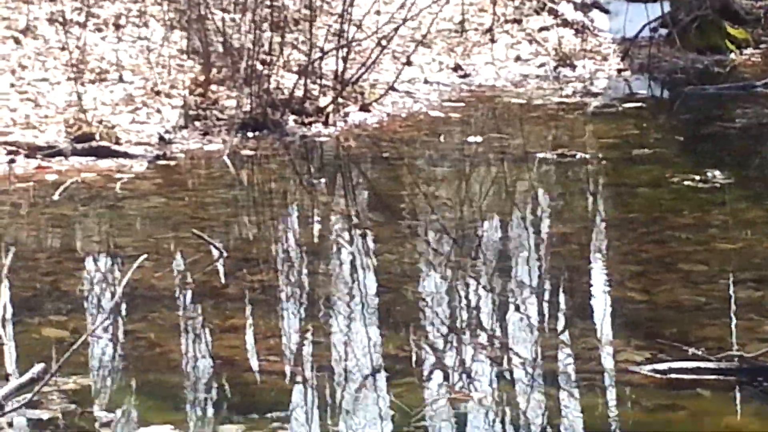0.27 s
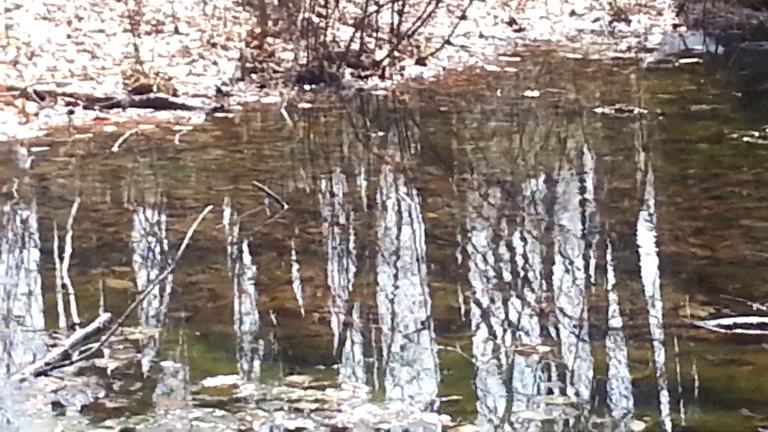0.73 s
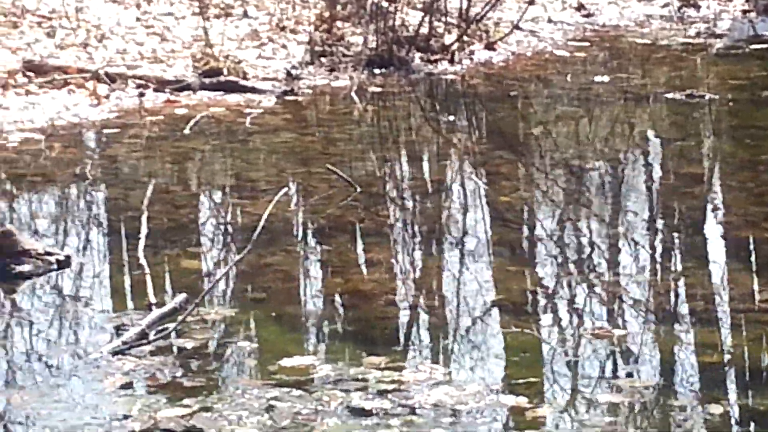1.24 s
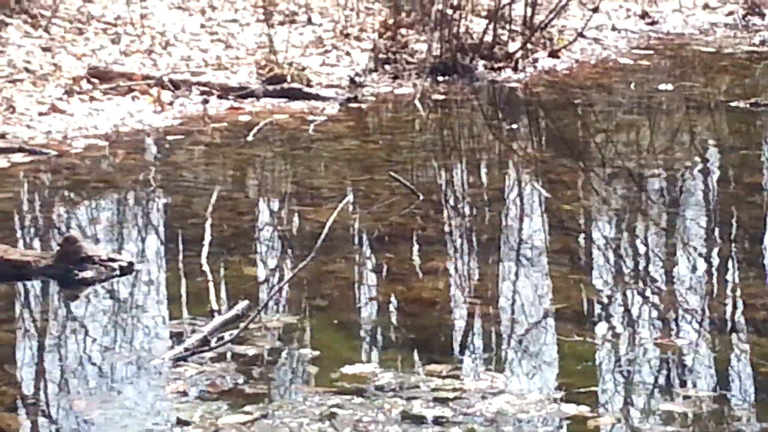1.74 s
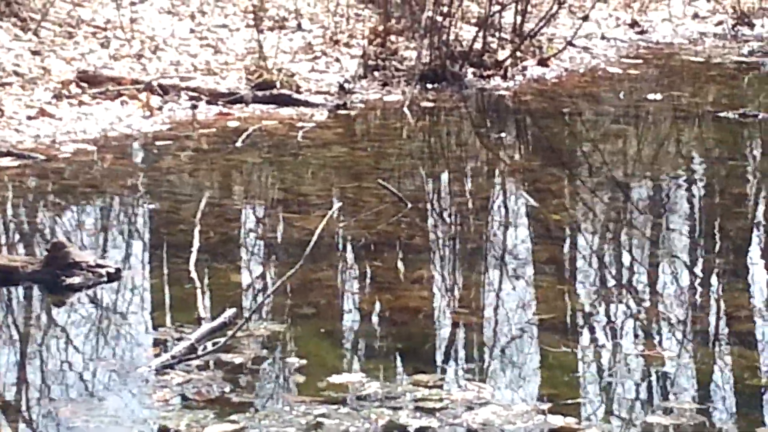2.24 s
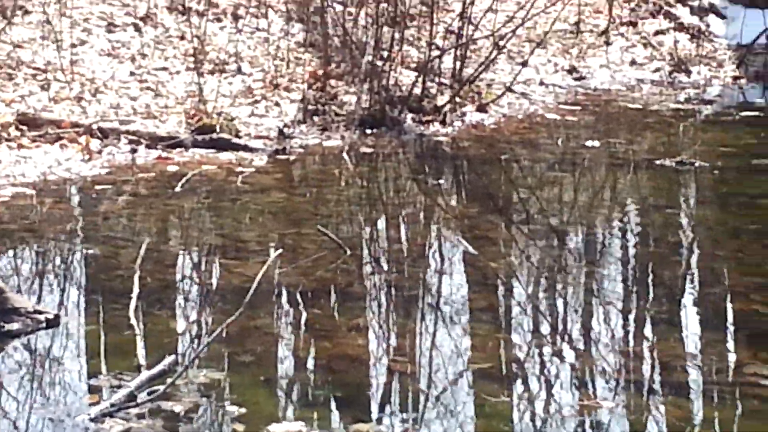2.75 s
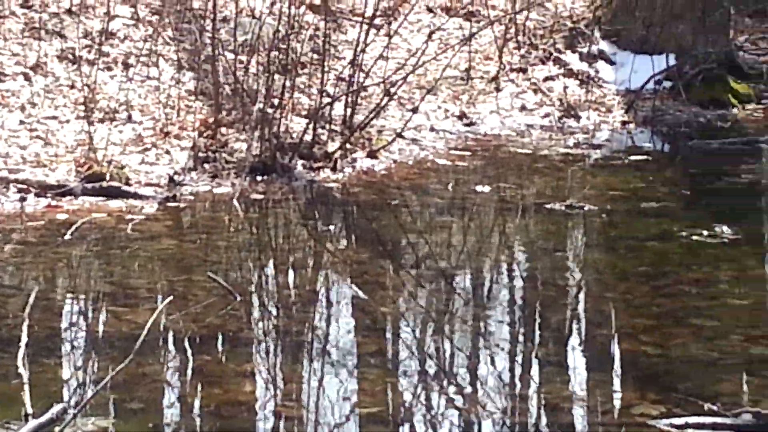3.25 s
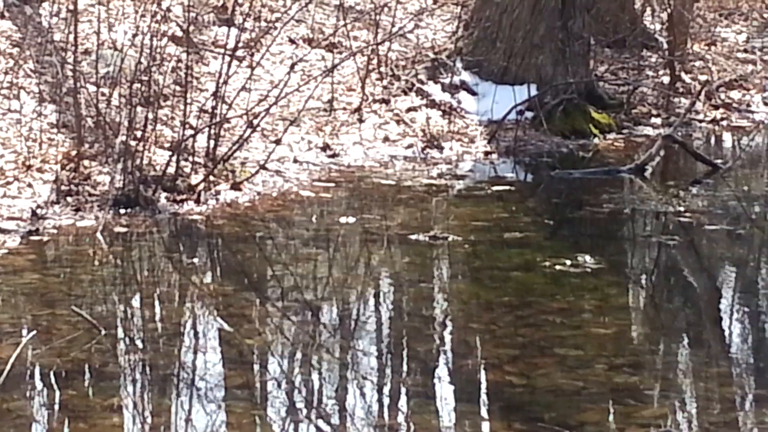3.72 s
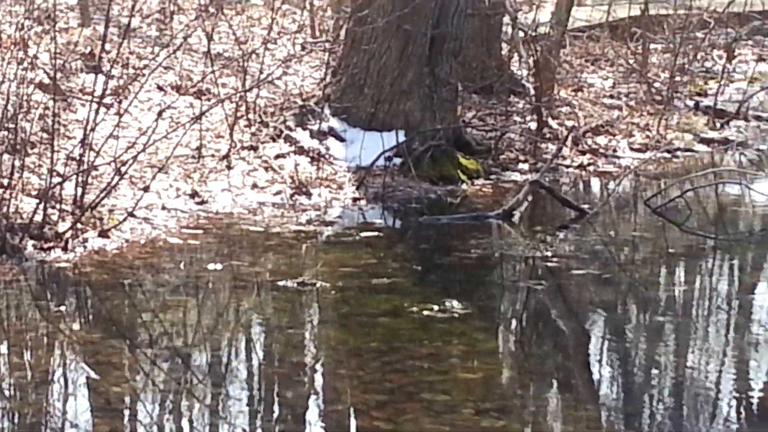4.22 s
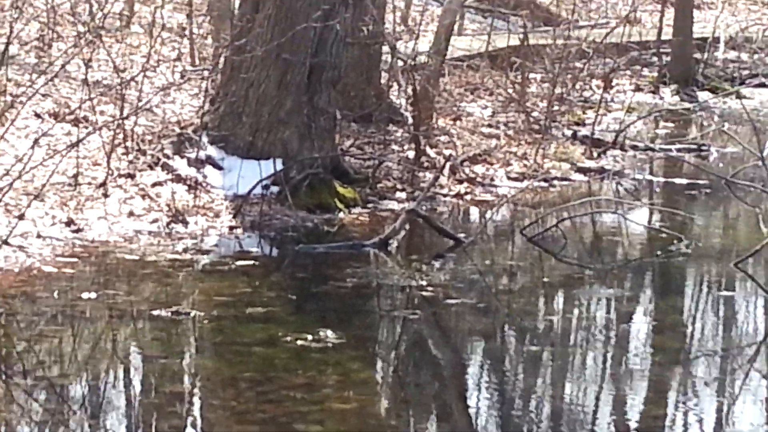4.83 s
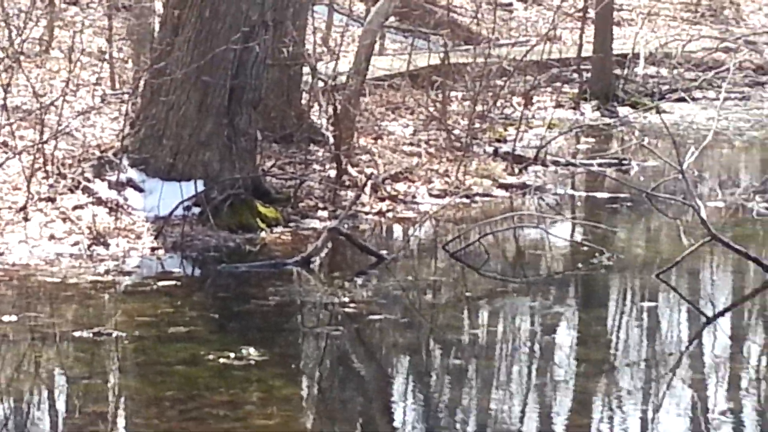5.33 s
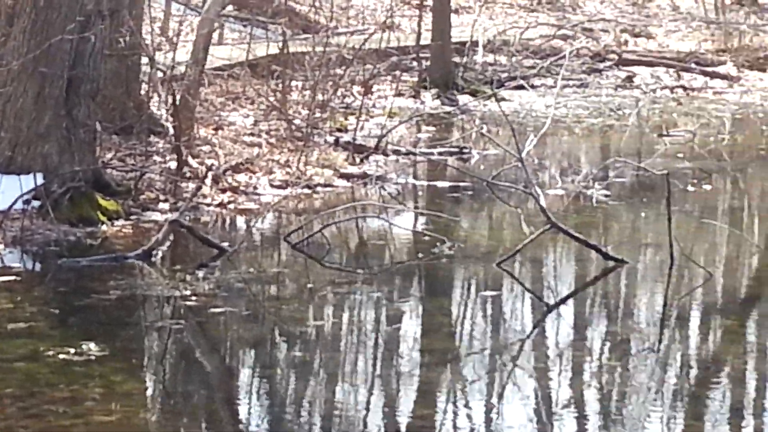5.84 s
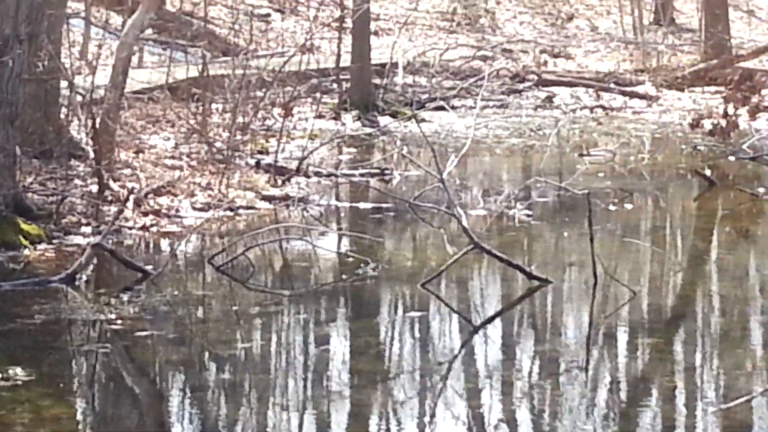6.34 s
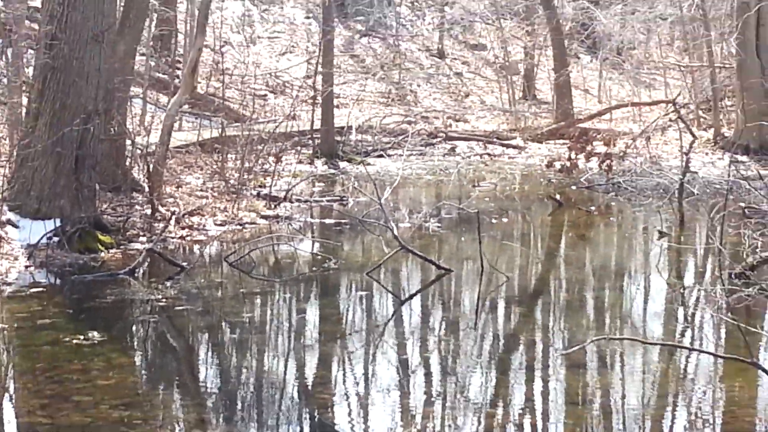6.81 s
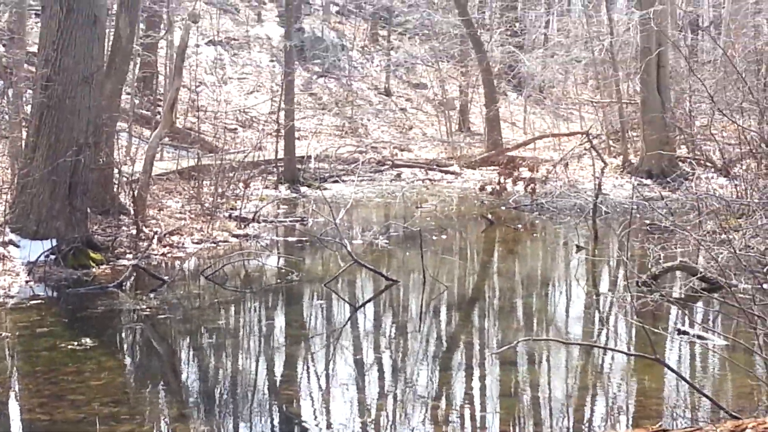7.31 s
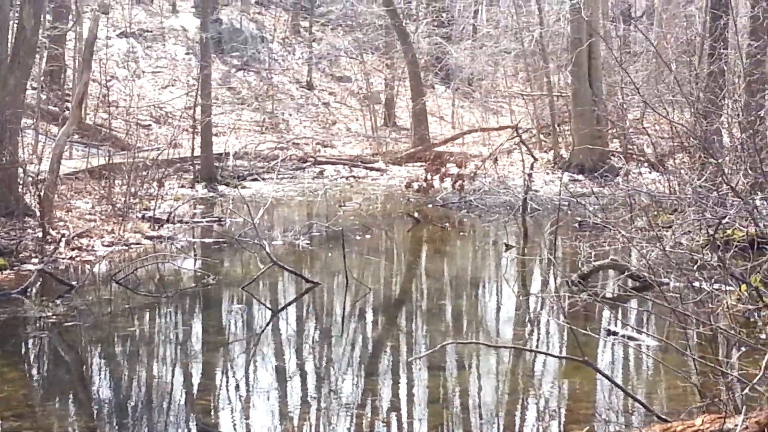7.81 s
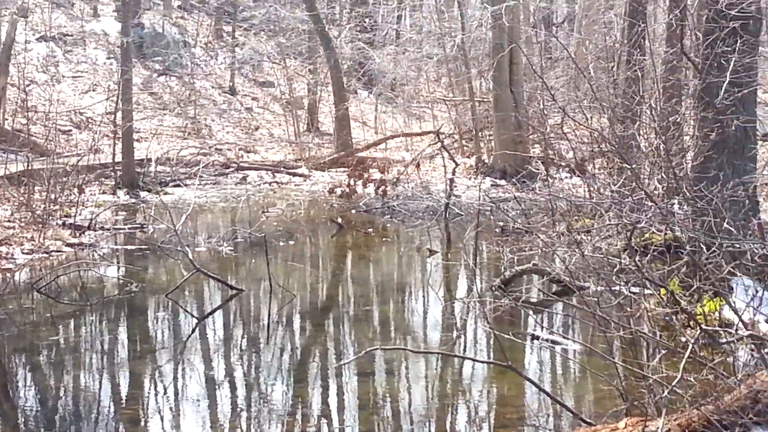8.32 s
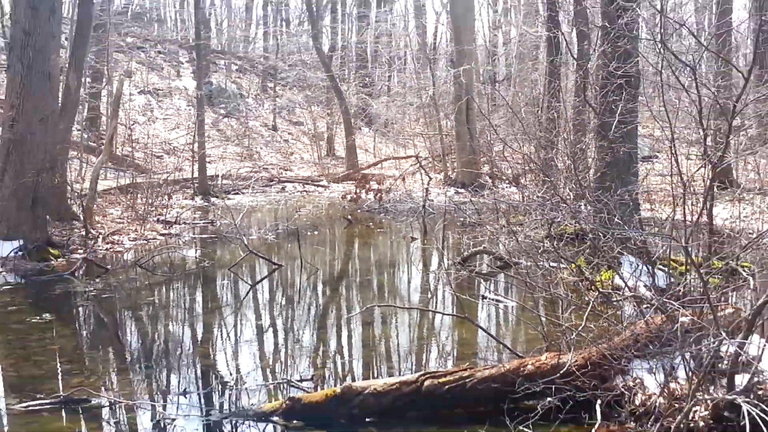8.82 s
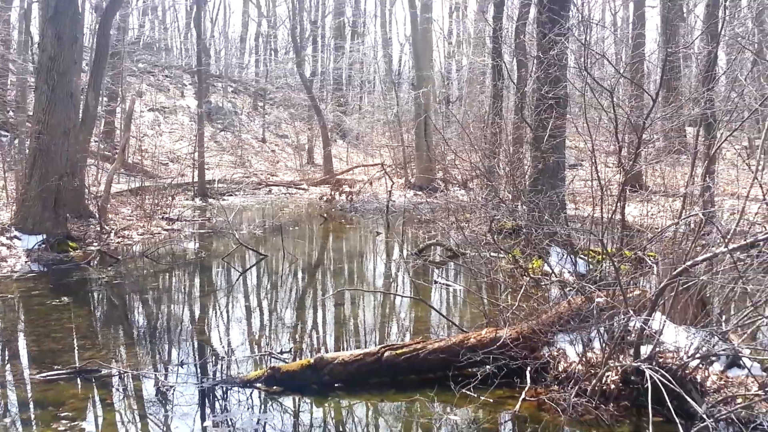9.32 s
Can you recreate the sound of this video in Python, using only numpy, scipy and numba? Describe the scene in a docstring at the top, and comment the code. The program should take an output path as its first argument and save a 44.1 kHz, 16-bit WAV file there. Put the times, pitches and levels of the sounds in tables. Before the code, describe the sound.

Short, clucking frog croaks overlap all around a pond in the woods, picked up in stereo by a hand-held microphone. The close ones are fairly dry, a few sharply louder, while the distant ones blur into an echoing chorus. A soft low handling thump comes about halfway, then a quick leaf scuff on the right, then two more thumps on the left, all over faint rumble and hiss.

```python
"""A woodland pond, from a hand-held camera with two microphone ports: frogs croaking all round.
A few dozen near croaks stand out of a far chorus; each is a short train of throat pulses that ring
the vocal sac and the mouth. Trunks scatter the calls, the far ones most. Leaves scuff once on the right,
the hand thumps the camera three times, and distant rumble and microphone hiss lie underneath."""
import sys
import numpy as np
from scipy import signal
from scipy.fft import rfft, irfft, next_fast_len
from scipy.io import wavfile
from numba import njit

SR = 44100
rng = np.random.default_rng(int(sys.argv[2]) if len(sys.argv) > 2 else 0)


def unload_wav(signal):
    """Save mono or channel-first audio to the path in sys.argv[1] as 16-bit WAV at rate SR, clipped to [-1, 1]."""
    wavfile.write(
        sys.argv[1],
        SR,
        np.round(np.clip(np.atleast_2d(signal).T, -1, 1) * 32767).astype(np.int16),
    )


N = 421596

# Croaks near the microphone: start_s, level_db, pitch_hz, length_ms, swell_share (of the length)
NEAR_CROAKS = [(0.0,-20,1560,21,0.32),(0.097,-24,1608,35,0.24),(0.257,-21,1598,24.3,0.41),(0.331,-28.5,1306,15,0.38),
               (0.375,-21.5,1548,42.3,0.25),(0.487,-22,1710,19,0.48),(0.616,-28.5,1490,24.5,0.34),(0.716,-17.5,1972,28.4,0.29),
               (0.788,-20,1710,20,0.41),(0.828,-9.5,1734,25,.04),(0.997,-22.5,1295,20,0.24),
               (1.353,-27.5,1498,29,0.36),(1.427,-27,1458,47,0.39),(1.485,-23.5,1443,83,.2),
               (1.59,-23.5,1526,31,.3),(1.73,-22.5,1490,44,0.28),(1.8,-23,1490,17,0.35),
               (1.868,-11,1715,26,.25),(2.062,-25.5,1425,20,0.39),(2.138,-27.5,1510,72,.2),
               (2.262,-24.5,1720,24,0.31),(2.443,-26,1500,27,0.38),(2.481,-21.5,1560,35,0.34),(2.77,-25.5,1642,40,0.24),
               (2.98,-24.5,1425,18,0.22),(3.13,-26,1524,24.5,0.38),
               (3.34,-18,1743,37.6,0.34),(3.44,-25,1620,51,0.19),(3.567,-13.5,1723,28,0.35),
               (3.764,-25,1674,66,0.32),(3.881,-23,1526,27,0.36),(4.012,-33,1465,32,0.27),
               (4.145,-23.5,1693,28.6,0.28),(4.302,-35,1412,59,0.29),(4.422,-23.5,1580,33,0.38),
               (4.497,-17,1683,38.6,0.42),(4.582,-25.5,1518,27,0.32),(4.706,-20,1448,26.5,0.22),
               (5.12,-23.5,1628,27,0.33),(5.287,-26.5,1394,35,0.27),(5.345,-24.5,1256,33,0.26),(5.404,-24.5,1519,35,.25),
               (5.626,-22,1693,25,0.29),(5.702,-26,1515,25,0.39),(5.807,-24.5,1456,35,0.48),
               (5.962,-16,1736,17.7,0.18),(6.064,-23.5,1590,26,.2),
               (6.244,-22.5,1507,51.6,0.33),(6.727,-21.5,1458,65,0.24),(7.103,-21,1619,45,0.29),
               (7.23,-16.5,1683,32.5,0.28),(7.347,-9.5,1620,25.4,.14),(7.656,-26,1413,34,0.28),
               (7.747,-22.5,1414,69,0.17),(7.905,-19.5,1583,38,.36),(7.976,-22,1552,39,0.37),
               (8.061,-19.5,1584,16.4,0.23),(8.199,-26.5,1436,37,0.51),(8.289,-21,1600,49,0.23),
               (8.432,-8.5,1518,20.5,0.14),(8.598,-23.5,1530,19,0.5),(8.632,-20.5,1636,33,.12),
               (8.662,-19,1511,35,0.32),(8.702,-21,1592,22,.4),(8.722,-18,1506,37,.25),
               (8.834,-18.5,1702,30,0.2),
               (9.04,-24,1730,29,0.29),(9.166,-21.5,1467,20.4,0.28),(9.23,-21.5,1454,37,0.37),(9.296,-20.5,1578,22.7,0.32),
               (9.424,-21,1450,32.5,0.28),(9.531,-11.5,1474,20.3,0.21)]
# Near croaks with a bright mouth ring: start_s, ring_hz, ring_db
BRIGHT_MOUTHS = [(0.375,3300,-9),(0.714,2800,2),(0.828,3870,-22),(1.868,2640,-5),
                 (3.13,4600,-6),(3.34,4230,-7.5),(3.44,3750,-10),(3.567,3300,-7),(4.422,2800,-6),
                 (4.706,3470,-8),(7.348,2970,-11.5),(7.905,3090,-12.5),
                 (8.704,3050,4.5),(8.834,3030,-7),(9.229,3030,-4),(9.531,2640,-10)]
# Modes of the vocal sac, rung by each pulse: pitch_ratio, t60_ms, gain_db
SAC_MODES = [(0.98, 7.58, 5.5), (0.523, 19.5, -12.5), (0.833, 21.7, -17), (1.34, 3.3, -10.5)]
# Level of the far croaks over time: time_s, level_db
CHORUS_LEVELS = [(0.0, -36), (1.1, -36.5), (2.2, -40.5), (3.7, -34), (4.95, -42), (5.9, -30.5), (6.55, -40),
                 (7.15, -29.5), (7.5, -41), (8.0, -37), (9.56, -32)]
# The hand on the camera body: start_s, level_db, pitch_hz, t60_ms, left_minus_right_db
HAND_THUMPS = [(4.533, -21, 219, 21, 3), (8.591, -32, 97.5, 31, 29), (9.135, -31.5, 99, 18, 30)]
# Spectrum of distant rumble and microphone hiss: frequency_hz, density_db (per Hz)
NOISE_SPECTRUM = [(25, -108), (70, -86.5), (160, -82), (430, -83.5), (1500, -84), (4000, -100),
                  (6300, -105), (8200, -102), (14000, -102)]

PITCH_SAG = 0.069  # share by which every ring drops over a croak


def throat_pulses(pitch_hz, length_ms, swell, slip_cycles):
    """The throat fires 22 pulses that speed up, swell and fade. Returns their offsets (s) and gains (dB)."""
    order = np.arange(-2, 20)  # two lead pulses come before the croak proper
    gap_scatter, slip, size_scatter = rng.standard_normal((3, len(swell), len(order)))
    first_gap_s = (6 - 5 * swell) / 1000 * np.exp(rng.normal(0, .1014, swell.shape))
    gaps = first_gap_s * (.62 + .38 * .8 ** np.maximum(order, 0)) * np.exp(.0775 * gap_scatter)
    gaps *= np.where((order < 0) & (swell < .15), 2, 1)  # lead pulses of sudden croaks stand apart
    # Pulses fall nearly in step with the sac: gaps last about whole cycles of its sagging pitch.
    elapsed_ms = 1000 * (np.cumsum(gaps, axis=1) - gaps[:, :3].sum(axis=1, keepdims=True))
    sac_hz = SAC_MODES[0][0] * pitch_hz * (1 - PITCH_SAG * np.clip(elapsed_ms / length_ms, 0, 1))
    gaps = (np.round(gaps * sac_hz) + slip_cycles * slip) / sac_hz
    offset_s = np.cumsum(gaps, axis=1) - gaps
    offset_s = offset_s - offset_s[:, 2:3]
    progress = 1000 * offset_s / length_ms
    arch_db = -np.where(progress < swell, 50, 18) * (progress - swell) ** 2
    stop_db = -45 * np.maximum(progress - 1, 0)
    lead_db = -7 + 4 * order - 50 * swell ** 2
    return offset_s, np.where(progress < 0, lead_db, arch_db + stop_db) + 1.8 * size_scatter


def frogs(croaks, spread_ms, slip_cycles):
    """Each throat pulse rings the sac, the mouth and a thin top note; the ports hear it slightly apart."""
    start_s, level_db, pitch_hz, length_ms, swell, mouth_hz, mouth_db = np.transpose(croaks)[:, :, None]
    offset_s, pulse_db = throat_pulses(pitch_hz, length_ms, swell, slip_cycles)
    progress = np.clip(1000 * offset_s / length_ms, 0, 1)
    bearing, top_pitch, top_level = rng.standard_normal((3, len(croaks), 1))
    # Loud croaks come from ahead, weak ones from the side, where the lag drifts as the camera turns.
    ahead_db, aside_db = -17.5, -25
    aside = np.clip((ahead_db - level_db) / (ahead_db - aside_db), 0, 1)
    left_lag_s = ((-.33 + .059 * start_s) * aside + spread_ms * bearing) / 1000
    rings = []  # ring_hz, t60_ms, gain_db
    for ratio, t60_ms, gain_db in SAC_MODES:
        slide = progress * (ratio < .9)  # the low modes grow and slide further down
        rings.append((ratio * pitch_hz * (1 - .12 * slide), t60_ms, gain_db + 5 * slide))
    rings.append((mouth_hz * (1 - .06 * progress), 5.5, mouth_db - 5 * progress))
    rings.append((5150 * (1 + .06 * top_pitch), 5, -22 + 3 * top_level))
    pitch_drift = 1 - PITCH_SAG * progress + rng.normal(0, .012, progress.shape)
    decay_scatter = np.exp(rng.normal(0, .2, progress.shape))
    pulse_s = start_s + offset_s
    out = np.zeros((2, N))
    for ring_hz, t60_ms, gain_db in rings:
        hz = (ring_hz * pitch_drift).ravel()
        t60_s = (t60_ms / 1000 * decay_scatter).ravel()
        size = undb(level_db + pulse_db + gain_db).ravel()
        add_rings(out[0], (pulse_s + left_lag_s / 2).ravel(), hz, t60_s, size, rise_s=.0004)
        add_rings(out[1], (pulse_s - left_lag_s / 2).ravel(), hz, t60_s, size * undb(1), rise_s=.0004)
    # The small sacs radiate no bass.
    return signal.sosfilt(signal.butter(4, 520, "high", fs=SR, output="sos"), out)


def near_frogs():
    """Croaks close to the microphone; the mouth rings dully in most, brightly in some."""
    dull_mouth = (2800, -25)  # ring_hz, ring_db
    croaks = np.array([row + dull_mouth for row in NEAR_CROAKS])
    for start_s, ring_hz, ring_db in BRIGHT_MOUTHS:
        croaks[np.argmin(abs(croaks[:, 0] - start_s)), 5:] = ring_hz, ring_db
    return frogs(croaks, spread_ms=.1, slip_cycles=.09)


def far_chorus(count):
    """Random croaks from all round the pond, their pulses more loosely in step with the sac."""
    start_s = rng.uniform(0, N / SR, count)
    level_db = np.interp(start_s, *np.transpose(CHORUS_LEVELS)) + rng.normal(0, 2, count)
    pitch_hz = rng.normal(1480, 190, count)
    length_ms, swell = rng.uniform(23, 38, count), rng.uniform(.1516, .4516, count)
    mouth_hz, mouth_db = 2700 + 2200 * rng.random(count) ** 2, rng.normal(-23, 3, count)
    croaks = np.transpose([start_s, level_db, pitch_hz, length_ms, swell, mouth_hz, mouth_db])
    return frogs(croaks, spread_ms=.24, slip_cycles=.3)


def trunk_echoes(calls, t60_s, level_db):
    """Trunks scatter the calls into a decaying noise tail, different at each port."""
    t = np.arange(SR // 2) / SR
    tail = rng.standard_normal((2, len(t))) * undb(-60 * t / t60_s) * (1 - np.exp(-t / .009))
    tail /= np.sqrt(np.sum(tail ** 2, axis=1, keepdims=True))
    return undb(level_db) * signal.fftconvolve(calls, tail, axes=1)[:, :N]


def leaf_rustle(count):
    """A short scuff of dry leaves off to the right: dense tiny grains, thickest in the middle."""
    middle_s, length_s, left_lag_s = 6.066, .084, .00012
    start_s = middle_s + length_s * (.7 * rng.random(count) + .3 * rng.random(count) - .5)
    hz = 2400 * 6.2 ** rng.random(count)
    t60_s = 8 / hz  # eight cycles
    size = undb(-36.5 - 10 * (hz > 7800) + rng.exponential(2.74, count))
    out = np.zeros((2, N))
    add_rings(out[0], start_s + left_lag_s, hz, t60_s, size * undb(-4 * (hz < 4500)), rise_s=.0001)
    add_rings(out[1], start_s, hz, t60_s, size, rise_s=.0001)
    return out


def hand_thumps():
    """Low knocks of the hand reach the microphone through the camera body."""
    start_s, level_db, hz, t60_ms, pan_db = np.transpose(HAND_THUMPS)
    out = np.zeros((2, N))
    add_rings(out[0], start_s, hz, t60_ms / 1000, undb(level_db + pan_db / 2), rise_s=.003)
    add_rings(out[1], start_s, hz, t60_ms / 1000, undb(level_db - pan_db / 2), rise_s=.003)
    return out


def rumble_and_hiss():
    """Distant rumble and microphone hiss; the bass is half shared by the ports and stronger on the left."""
    size = next_fast_len(N)
    hz = np.arange(size // 2 + 1) * SR / size + 1
    point_hz, point_db = np.transpose(NOISE_SPECTRUM)
    density = undb(np.interp(np.log(hz), np.log(point_hz), point_db))
    shared = .5 / (1 + (hz / 1200) ** 2)
    pan_db = 1.3 / (1 + (hz / 90) ** 2)
    noise = rfft(rng.standard_normal((2, size))) * density * np.sqrt(SR / 4)
    mid, side = noise * np.sqrt([1 + shared, 1 - shared])
    left, right = (mid + side) * undb(pan_db / 2), (mid - side) * undb(-pan_db / 2)
    return irfft(np.array([left, right]), size)[:, :N]


def undb(db):
    """Decibels to amplitude."""
    return 10 ** (np.asarray(db) / 20)


@njit
def add_rings(out, start_s, hz, t60_s, size, rise_s):
    """Add damped sines with soft onsets, timed to a fraction of a sample."""
    for k in range(len(start_s)):
        first = int(start_s[k] * SR) + 1
        late = first - start_s[k] * SR
        pole = 2j * np.pi * hz[k] / SR - np.log(1000) / (t60_s[k] * SR)
        ring, ring_step = size[k] * np.exp(pole * late), np.exp(pole)
        unrisen, rise_step = np.exp(-late / (rise_s * SR)), np.exp(-1 / (rise_s * SR))
        for i in range(max(first, 0), min(first + int(t60_s[k] * SR), len(out))):
            out[i] += ring.imag * (1 - unrisen) ** 2
            ring *= ring_step
            unrisen *= rise_step


def scene():
    """The pond at the two ports: near frogs fairly dry, the far chorus deep in echoes."""
    near, far = near_frogs(), far_chorus(count=450)
    near = near + trunk_echoes(near, t60_s=.19, level_db=-11)
    far = far + trunk_echoes(far, t60_s=.3, level_db=-3)
    return near + far + leaf_rustle(count=800) + hand_thumps() + rumble_and_hiss()


def record(dry):
    """The camera cuts the treble steeply above 14.5 kHz."""
    return signal.sosfilt(signal.ellip(12, .2, 80, 14500, fs=SR, output="sos"), dry)


dry = scene()
out = record(dry)
unload_wav(out)
```